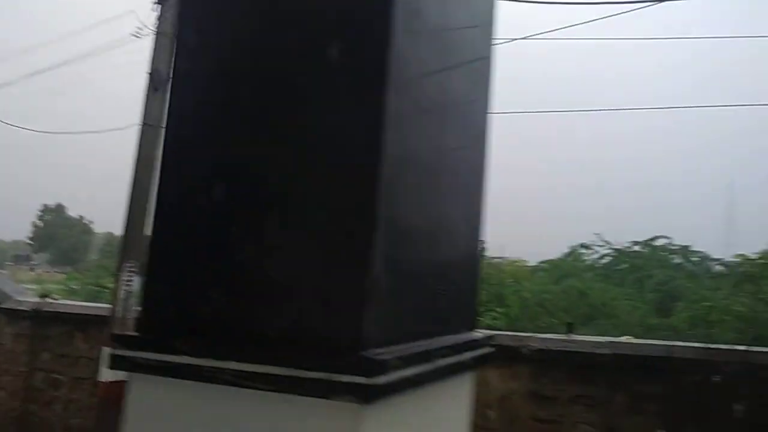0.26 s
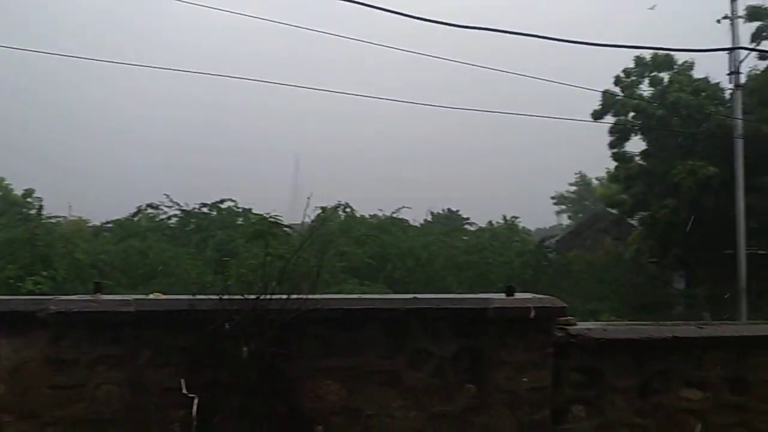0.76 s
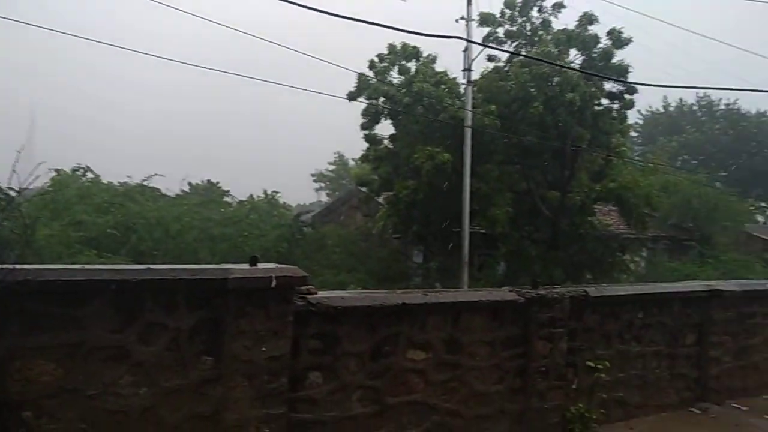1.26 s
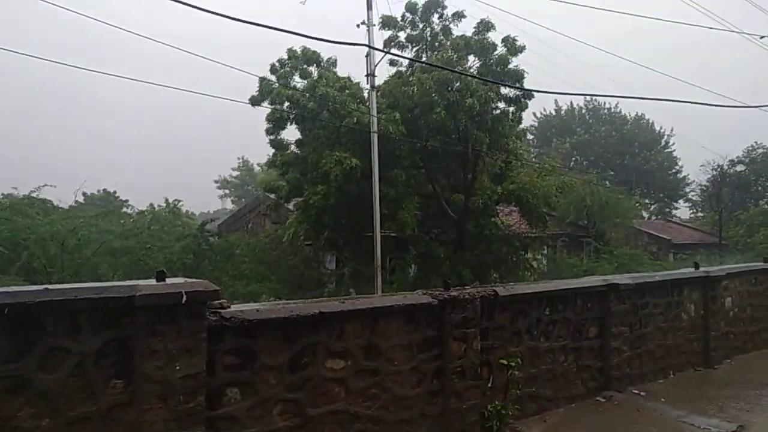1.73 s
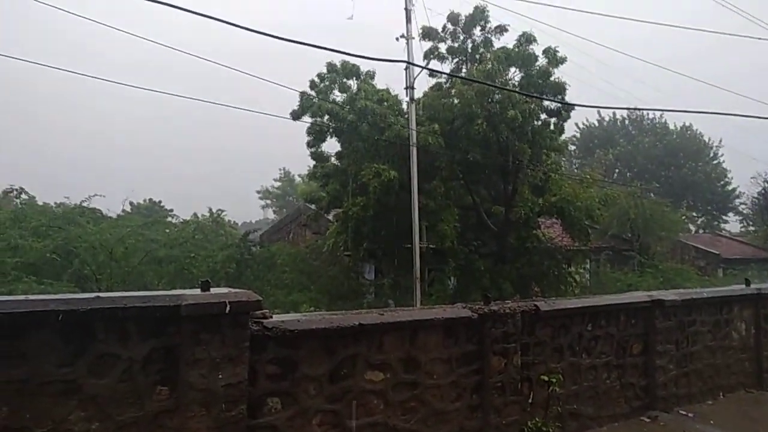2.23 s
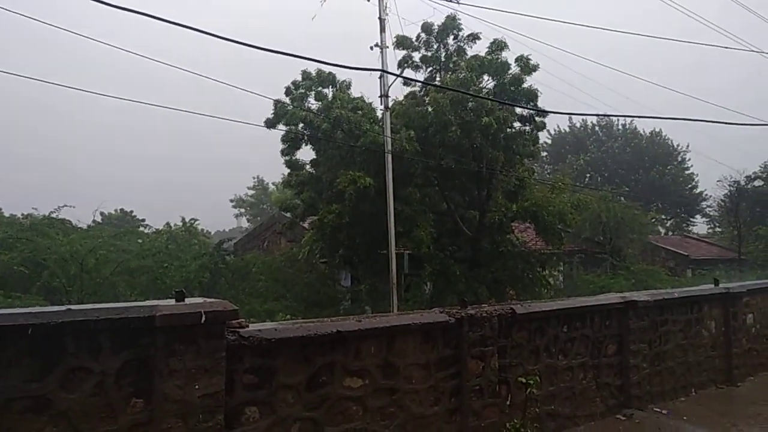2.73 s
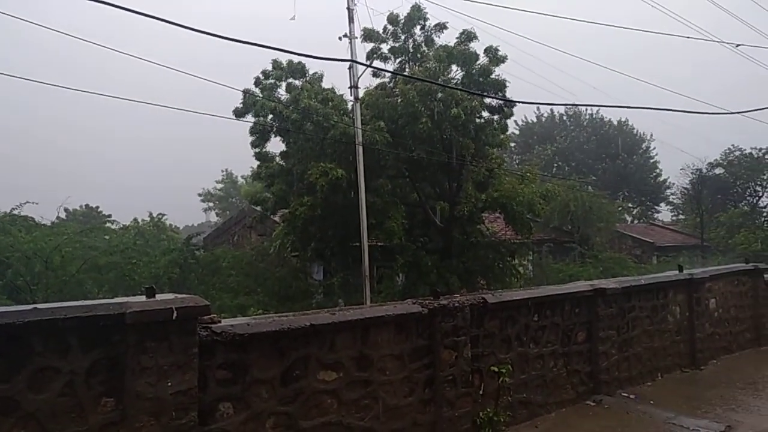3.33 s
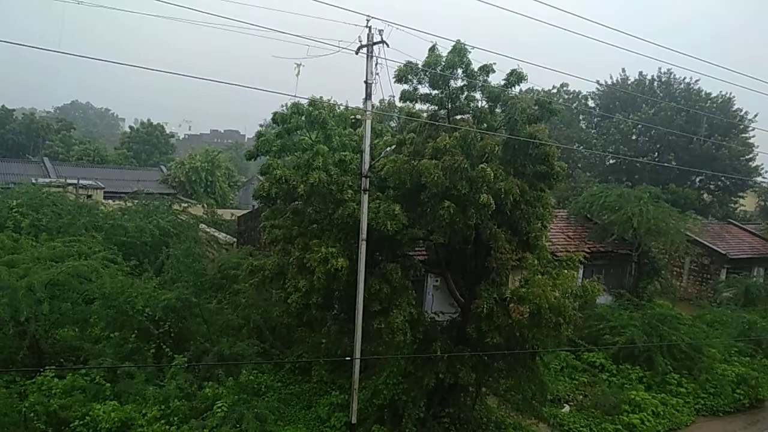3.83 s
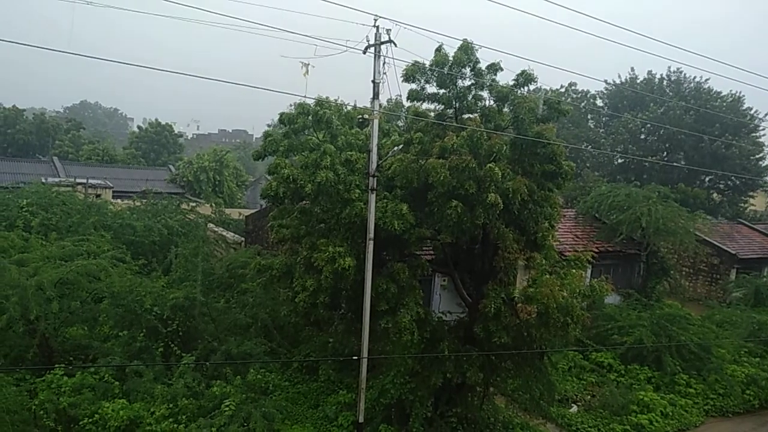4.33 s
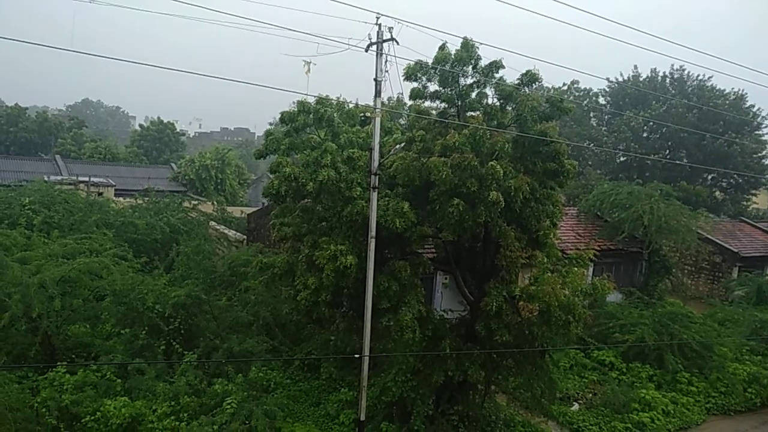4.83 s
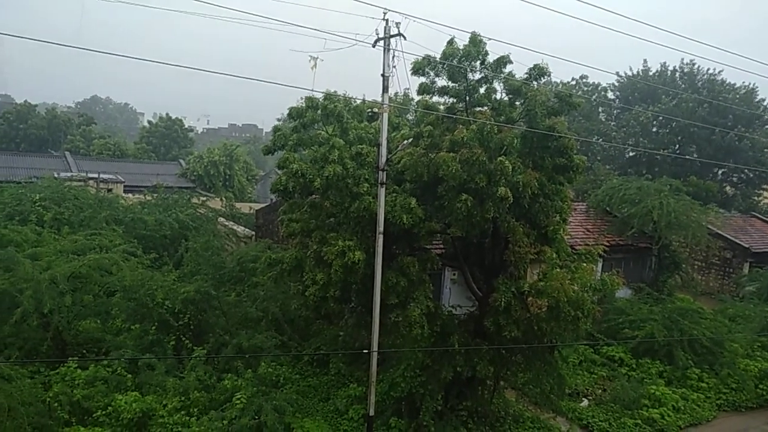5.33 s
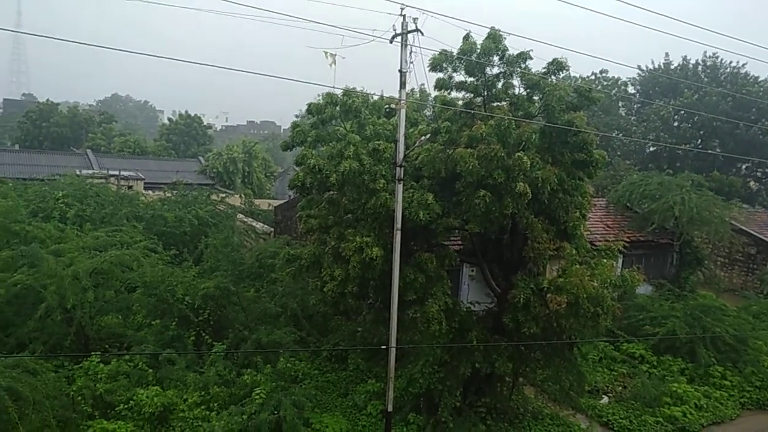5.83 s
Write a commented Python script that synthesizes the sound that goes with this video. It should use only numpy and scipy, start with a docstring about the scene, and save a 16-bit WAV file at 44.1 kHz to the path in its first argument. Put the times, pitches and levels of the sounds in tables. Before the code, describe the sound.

From 0 s heavy rain is already falling, heard by a phone under a porch: a bright, grainy hiss with roof run-off slapping the wet yard close by and crisp, high spits of spray. Several slaps and spits crowd the first 0.8 s; around 0.9-1.3 s it thins a little, then wet plops resume. As the phone turns, the rain's colour slides subtly. A heavy slap lands near 1.7 s, and from 2.5 to 3.4 s the splashing is thickest and loudest, with strong slaps around 2.7-3.0 s and sharp spray. At 3.5 s an instant cut moves to an upper floor: clearly quieter, smoother, steady rain on trees and roofs below, with small, soft, distant splashes scattered to the end at about 6 s. A very faint low drone lies under both parts, swelling briefly near 4.9 s.

```python
"""Roof run-off slaps a wet yard and sprays close by, heard by a phone that turns under a porch; after a cut,
monsoon rain is heard from an upper floor above the trees, softer and smoother. A low drone lies under both.
Rain is many short decaying sines on patchy noise, coloured by a spectrum for each view; slaps, spits and
splashes are a strong drop with a fading spatter of finer ones; the drone is filtered noise in two bands."""
import sys
import numpy as np
from scipy import signal
from scipy.fft import rfft, irfft, next_fast_len
from scipy.io import wavfile
from scipy.ndimage import uniform_filter1d, map_coordinates

SR = 44100
rng = np.random.default_rng(int(sys.argv[2]) if len(sys.argv) > 2 else 0)


def materialize(psi):
    """Save the field psi as 16-bit PCM at rate SR to the path in sys.argv[1].

    A 1-D psi becomes a single channel; in a 2-D psi each row is a channel.
    """
    bounded = np.clip(np.atleast_2d(psi).T, -1, 1)
    quanta = np.round(bounded * 32767).astype(np.int16)
    wavfile.write(sys.argv[1], SR, quanta)


N = 267687

# Rain colour toward the porch pillar, relative density: freq_hz, level_db_per_hz
PILLAR_COLOUR = [(250, -49), (400, -23), (600, -12.5), (1200, -8), (1500, -3), (2400, -12), (3000, -3.5),
                 (3800, -12.5), (5000, -8), (6500, -5.5), (9500, -0.5), (12000, -4), (15700, -6.5)]
# Rain colour toward the wall: freq_hz, level_db_per_hz
WALL_COLOUR = [(250, -48), (400, -18), (600, -9), (850, -11), (1500, -10), (1900, -1.5), (2400, -7),
               (3800, -7), (5500, -8), (8000, -4), (9700, 2.5), (13500, -6), (15700, -8)]
# Rain colour toward the gate: freq_hz, level_db_per_hz
GATE_COLOUR = [(250, -47), (400, -12), (600, -8), (1500, -12), (1900, 2.5), (2700, 3), (4600, -5),
               (7800, -8), (9500, -4.5), (11700, 0), (13500, -3), (15700, -8)]
# Rain colour toward the yard: freq_hz, level_db_per_hz
YARD_COLOUR = [(250, -54), (400, -14), (850, -10.5), (1200, -8.5), (2100, -2), (3000, -2), (4600, -9),
               (6300, -10.5), (9500, -1), (10500, 2.5), (13500, -6.5), (15700, -4.5)]
# Rain colour from upstairs: freq_hz, level_db_per_hz
TREES_COLOUR = [(240, -32.5), (400, -22.5), (488, -21.5), (849, -15.5), (1090, -15.5), (1190, -15),
                (2100, -11), (2810, -5.5), (3230, -7.5), (4320, -16), (5360, -7.5), (8630, -6), (10400, -3),
                (14100, -10), (15700, -16)]
# Drone colour, relative density: freq_hz, level_db_per_hz
DRONE_COLOUR = [(18, -43), (30, -19), (96, -0.5), (184, -6), (296, 1.5), (375, -1.5), (450, -6.5),
                (580, -9), (990, -120)]
# Turning of the phone: time_s, heading (0 pillar, 1 wall, 2 gate, 3 yard)
HEADINGS = [(.3, 0), (.7, 1), (2.4, 0.5), (2.6, 2), (2.9, 2), (3.0, 3)]
# Rain levels per heading, pillar to yard: patter_db, spray_db
HEADING_LEVELS = [(-32, -21), (-31, -24), (-27.5, -24.5), (-29, -22.5)]
# Porch resonances: freq_hz, width_hz, gain_db
PORCH_MODES = [(1308, 18, 5.5), (1860, 25, 2.5), (2130, 28, -0.5), (2420, 18, 0), (4080, 86, 4.5)]
# Strongest run-off lumps on the yard: start_s, level_db, pitch_hz
YARD_SLAPS = [(0.016, -11.5, 3000), (0.082, -11.5, 1900), (0.122, -13.5, 1830), (0.175, -16.5, 2020),
              (0.238, -12.5, 1930), (0.328, -23, 2850), (0.371, -15.5, 2350), (0.493, -17, 2330),
              (0.537, -15.5, 2060), (0.709, -16, 3410), (0.808, -16, 3180), (0.876, -19.5, 2810),
              (1.054, -15, 3300), (1.088, -18, 2280), (1.331, -18.5, 3170), (1.362, -16, 2260),
              (1.433, -18.5, 2100), (1.481, -14, 2520), (1.551, -14, 2880), (1.587, -13, 1710),
              (1.717, -7.5, 3150), (1.8, -12.5, 3100), (1.859, -11, 3100), (1.918, -10.5, 2650),
              (2.165, -10.5, 2880), (2.289, -14, 2220), (2.53, -13.5, 2340), (2.562, -14, 2870),
              (2.645, -9, 3060), (2.662, -16, 2600), (2.733, -7.5, 2250), (2.865, -12.5, 2900),
              (2.879, -6, 3000), (2.902, -18, 2870), (2.998, -6, 2180), (3.023, -7, 2400),
              (3.106, -13, 2490), (3.16, -11.5, 3150), (3.218, -11.5, 3240), (3.238, -12, 1970),
              (3.381, -14.5, 2240), (3.437, -12, 2140)]
# Bright spits of spray, loud to very faint: start_s, level_db, pitch_hz
SPRAY_SPITS = [(0.0992, -6, 12200), (0.2354, -12, 10200), (0.3158, -5.5, 7750), (0.3273, -5, 7930),
               (0.3364, -9, 8800), (0.454, -10, 8150), (0.5472, -6, 10600), (0.6227, -7, 10700),
               (0.692, -6, 10900), (0.7433, -4, 9900), (0.7913, -6, 9800), (0.855, -32, 10800),
               (1.3299, -14, 9340), (1.433, -9, 11100), (1.8587, -5.5, 10200), (1.884, -4, 10300),
               (2.0577, -8, 10300), (2.165, -9, 9040), (2.315, -6, 11000), (2.5506, -4, 10700),
               (2.612, -7, 11500), (2.6695, -7.5, 11300), (2.7073, -6, 11400), (2.7656, -4.5, 11900),
               (2.823, -6, 12400), (2.916, -10, 12200), (2.93, -11, 8560), (2.9647, -9, 10600),
               (3.074, -9, 9600), (3.1028, -7, 9100), (3.1692, -7, 11900), (3.3558, -4, 9600),
               (3.425, -6, 10900), (3.437, -7, 10700)]
# Farther splashes below the upper floor: start_s, level_db, pitch_hz
FAR_SPLASHES = [(3.726, -20, 3300), (3.96, -19, 2370), (4.023, -15.5, 3250), (4.135, -16.5, 3050),
                (4.479, -14.5, 2710), (5.159, -18.5, 3230), (5.293, -17, 3040), (5.384, -17.5, 7000),
                (5.447, -15.5, 3200), (5.616, -17.5, 3100), (5.733, -17.5, 2760), (5.799, -18, 3050),
                (5.901, -18, 2760)]
# Brief swells of the deep drone: centre_s, rise_db
DRONE_SWELLS = [(0.05, 4), (0.93, 5), (4.92, 11)]

CUT_S = 3.505  # porch to upper floor
SPLIT_HZ, TOP_HZ = 5000, 15780  # patter/spray crossover; band limit
UPSTAIRS_PATTER_DB, UPSTAIRS_SPRAY_DB = -33.5, -32.5
SLAP_S, SPIT_S, SPLASH_S = .026, .008, .024  # spatter time scales
SMALL_SLAP_DB, SMALL_SLAP_HZ = -20, 2070  # weaker events: centre level and pitch
SMALL_SPLASH_DB, SMALL_SPLASH_HZ = -24, 4340
DEEP_START_DB, DEEP_SINK_DB_PER_S = -55.5, 2.03
UPPER_PORCH_DB, UPPER_UPSTAIRS_DB = -53, -56.5
SWELL_HALF_S = 0.083  # to 1/e of the rise in dB
SURGE_DB, SURGES_PER_S = 0.76, 55  # uneven run-off, patter and spray alike


def amp(db):
    """dB to gain."""
    return 10 ** (np.asarray(db) / 20)


def unit(x):
    """Scale to rms 1."""
    return x / np.sqrt(np.mean(x ** 2) + 1e-20)


def along(points, hz):
    """Interpolate (freq_hz, value) points on a log axis."""
    f, v = np.transpose(points)
    return np.interp(np.log(hz + 1), np.log(f + 1), v)


def curves(rows):
    """One value per sample for each column after the time."""
    s, *cols = np.transpose(rows)
    return [np.interp(np.arange(N) / SR, s, c) for c in cols]


def wobble(knots_per_s):
    """Smooth random curve through normal knots, at most 150 a second."""
    knots = rng.standard_normal(int(N * 150 / SR) + 4)
    return map_coordinates(knots, [np.arange(N) * min(knots_per_s, 150) / SR])


def filtered(x, response):
    """Multiply the spectrum of x by a response of frequency."""
    m = next_fast_len(N + 8192)
    return irfft(rfft(x, m) * response(np.fft.rfftfreq(m, 1 / SR)), m)[:N]


def drops(start_s, hz, height, cycles, samples):
    """Each drop is a sine that swells at once and dies within a few cycles, cut at a sample limit."""
    k = np.arange(samples)
    u = k * hz[:, None] / SR / cycles
    envelope = 4 * u * np.exp(1 - 4 * u)
    wave = height[:, None] * envelope * np.sin(2 * np.pi * cycles * u)
    at = np.round(start_s * SR).astype(int)[:, None] + k
    return np.bincount(at.ravel(), wave.ravel(), N + SR)[:N]


def hiss(patchy_db):
    """Countless far drops merge to white noise with time-frequency patches of random gain."""
    z = signal.stft(rng.standard_normal(N + 512), nperseg=256)[2]
    field = uniform_filter1d(rng.standard_normal(z.shape), size=5, axis=0)
    field = uniform_filter1d(field, size=12, axis=1)
    patchy = signal.istft(z * amp(patchy_db * unit(field)), nperseg=256)[1]
    return unit(patchy[:N])


def shower(count, samples, lo_hz, hi_hz, cycles, scatter_db, clump_db, clumps_per_s, far_db, patchy_db):
    """Uncoloured rain: near drops of uneven size on the hiss of far ones, surging in clumps."""
    when, pitch, luck = rng.random((count, 3)).T
    hz = lo_hz + (hi_hz - lo_hz) * pitch
    rare = -np.log(1 - .99 * luck)  # big drops are rare, with a size limit
    height = np.sqrt(hz) * amp(scatter_db * rare)  # higher drops are shorter, so taller
    near = unit(drops(when * N / SR, hz, height, cycles, samples))
    rain = near + amp(far_db) * hiss(patchy_db)
    return unit(rain * amp(clump_db * wobble(clumps_per_s)))


def coloured(low, high, spectrum):
    """Patter and spray, each of rms 1, in the colour of one view."""
    def low_share(hz):
        return 1 / (1 + (hz / SPLIT_HZ) ** 12)  # of power

    def gain(hz):
        return amp(along(spectrum, hz))

    patter = filtered(low, lambda hz: gain(hz) * np.sqrt(low_share(hz)))
    spray = filtered(high, lambda hz: gain(hz) * np.sqrt(1 - low_share(hz)))
    return np.array([unit(patter), unit(spray)])


def small(start_s, end_s, db, hz, count):
    """Rows for weaker events at random moments, near one level and pitch."""
    when, loud, high = rng.random((count, 3)).T
    moments_s = start_s + (end_s - start_s) * when
    return np.transpose([moments_s, db + 6 * (loud - .5), hz * np.exp(.5 * (high - .5))])


def bursts(events, length_s, count, samples, cycles, spread, first_db, spatter_db, scatter_db):
    """Water lands with one strong drop, then breaks into a dense, fading spatter of finer ones."""
    start_s, db, hz = np.transpose(events)[..., None]
    later = np.arange(count) > 0
    age = later * 2.5 * rng.random((len(start_s), count))  # in burst lengths
    luck = rng.standard_normal((len(start_s), count, 2))
    pitch_hz = np.clip(hz * np.exp(later * spread * (luck[..., 1] - 0.1)), 750, SR / 2.5)
    # summed power of drops that sound together
    overlap = count / (2.5 * length_s) * .23 * cycles / pitch_hz
    fade_db = -4.5 * age ** 1.56
    height = amp(db + spatter_db + fade_db + scatter_db * luck[..., 0]) / np.sqrt(overlap)
    height[:, 0] = amp(db[:, 0] + first_db)
    times_s = start_s + age * length_s
    return drops(times_s.ravel(), pitch_hz.ravel(), height.ravel(), cycles, samples)


def rumble():
    """Low, unsteady drone: coloured noise in a sinking, swelling deep part and an upper part."""
    t = np.arange(N) / SR
    swells_db = sum(db * np.exp(-((t - s) / SWELL_HALF_S) ** 2) for s, db in DRONE_SWELLS)
    deep_db = DEEP_START_DB - DEEP_SINK_DB_PER_S * t + swells_db
    upper_db = np.where(t < CUT_S, UPPER_PORCH_DB, UPPER_UPSTAIRS_DB)
    noise = filtered(hiss(patchy_db=1.5), lambda hz: amp(along(DRONE_COLOUR, hz)))
    deep = filtered(noise, lambda hz: 1 / (1 + (hz / 180) ** 6))
    return amp(deep_db) * unit(deep) + amp(upper_db) * unit(noise - deep)


def upstairs():
    """Rain on leaves and roofs below; far splashes are fine-grained, in the colour of the place."""
    low = shower(count=6000, samples=100, lo_hz=297, hi_hz=5830, cycles=2.8, scatter_db=1.5,
                 clump_db=0.1, clumps_per_s=40, far_db=12, patchy_db=1.5)
    high = shower(count=10000, samples=40, lo_hz=4030, hi_hz=17300, cycles=3.5, scatter_db=3,
                  clump_db=0.84, clumps_per_s=70, far_db=8.5, patchy_db=1.0)
    rain = amp([UPSTAIRS_PATTER_DB, UPSTAIRS_SPRAY_DB]) @ coloured(low, high, TREES_COLOUR)
    weak = small(CUT_S, N / SR, SMALL_SPLASH_DB, SMALL_SPLASH_HZ, count=20)
    splashes = bursts(np.vstack([FAR_SPLASHES, weak]), SPLASH_S, count=200, samples=140, cycles=4.9,
                      spread=0.6, first_db=-1.0, spatter_db=-6.5, scatter_db=2)
    return rain + filtered(splashes, lambda hz: amp(0.74 * along(TREES_COLOUR, hz)))


def porch_response(hz):
    """Direct sound plus resonant bands of the porch."""
    response = 1
    for centre_hz, width_hz, db in PORCH_MODES:
        damping = 1j * hz * width_hz
        response = response + (amp(db) - 1) * damping / (centre_hz ** 2 - hz ** 2 + damping)
    return response


def porch():
    """Run-off patters, slaps and spits close by; turning slides the rain between colours and levels."""
    low = shower(count=7000, samples=100, lo_hz=296, hi_hz=6190, cycles=3.7, scatter_db=4.0,
                 clump_db=1.07, clumps_per_s=22, far_db=9.5, patchy_db=1.5)
    high = shower(count=16000, samples=40, lo_hz=3770, hi_hz=16600, cycles=5.2, scatter_db=3.0,
                  clump_db=0.8, clumps_per_s=60, far_db=2.5, patchy_db=2.5)
    heading, = curves(HEADINGS)
    views = [PILLAR_COLOUR, WALL_COLOUR, GATE_COLOUR, YARD_COLOUR]
    rain = np.zeros(N)
    for k, (view, levels_db) in enumerate(zip(views, HEADING_LEVELS)):
        weight = np.clip(1 - np.abs(heading - k), 0, 1)
        rain += weight * (amp(levels_db) @ coloured(low, high, view))
    rain *= amp(SURGE_DB * wobble(SURGES_PER_S))
    weak = small(0, CUT_S, SMALL_SLAP_DB, SMALL_SLAP_HZ, count=30)
    slaps = bursts(np.vstack([YARD_SLAPS, weak]), SLAP_S, count=80, samples=150, cycles=3.8,
                   spread=0.32, first_db=-3.0, spatter_db=-15.5, scatter_db=2.0)
    spits = bursts(SPRAY_SPITS, SPIT_S, count=20, samples=60, cycles=5.5,
                   spread=0.13, first_db=-1.5, spatter_db=-16.5, scatter_db=3.5)
    return filtered(rain + slaps + spits, porch_response)


def scene():
    """The porch gives way to the upper floor within a millisecond, over the drone."""
    later = np.clip((np.arange(N) / SR - CUT_S) / .001, 0, 1)
    return ((1 - later) * porch() + later * upstairs() + rumble())[None]


def record(dry):
    """The phone keeps nothing at or above its band limit."""
    return filtered(dry[0], lambda hz: hz < TOP_HZ)[None]


dry = scene()
out = record(dry)
materialize(out)
```